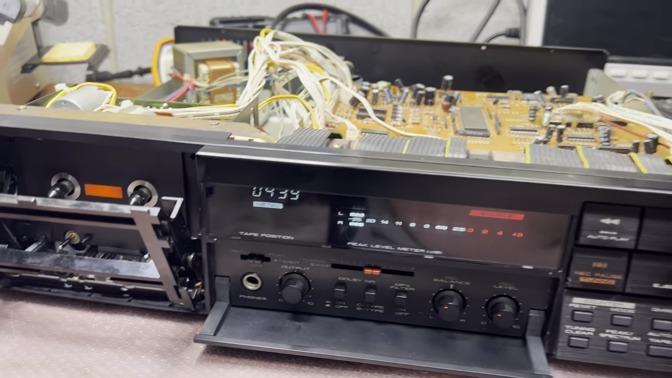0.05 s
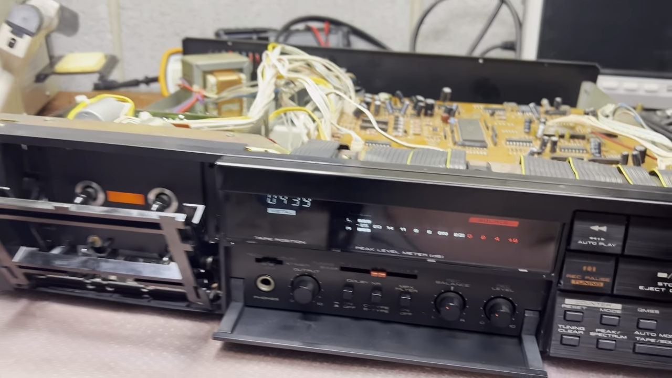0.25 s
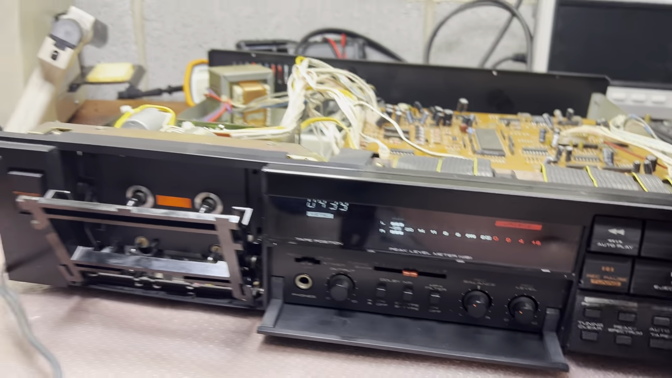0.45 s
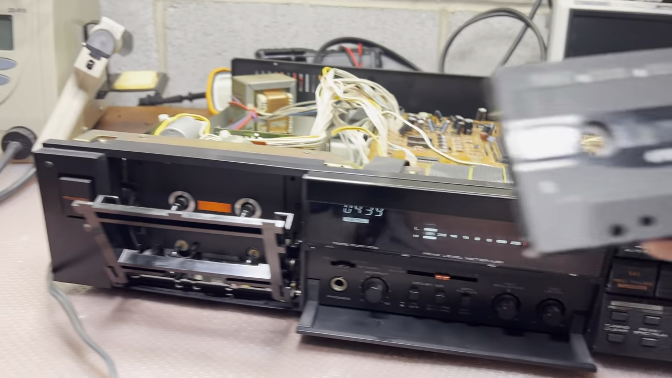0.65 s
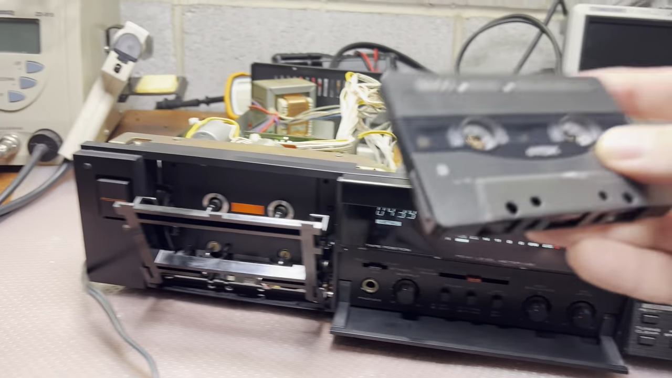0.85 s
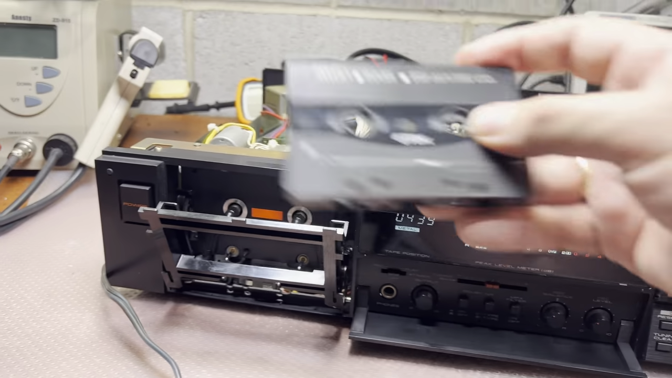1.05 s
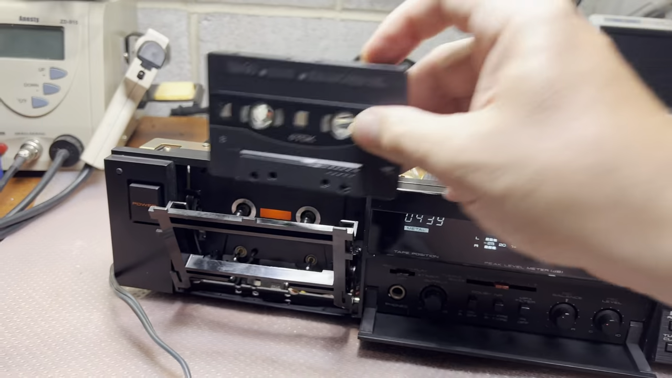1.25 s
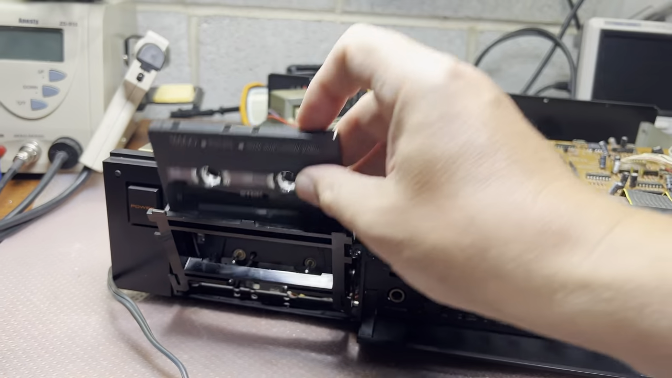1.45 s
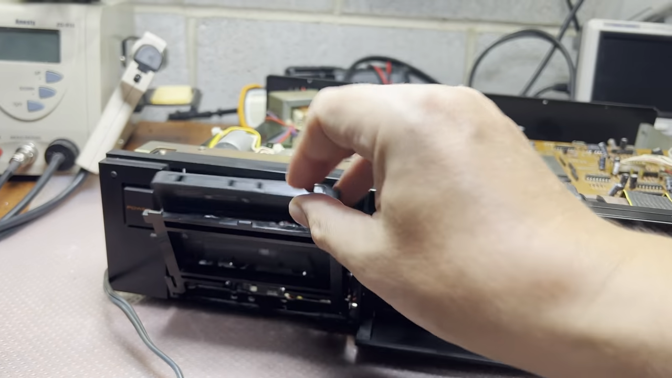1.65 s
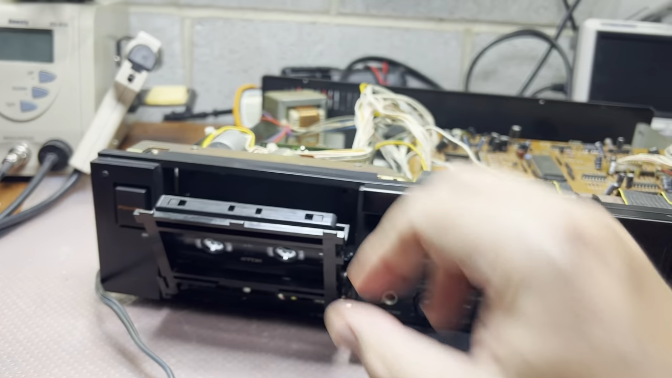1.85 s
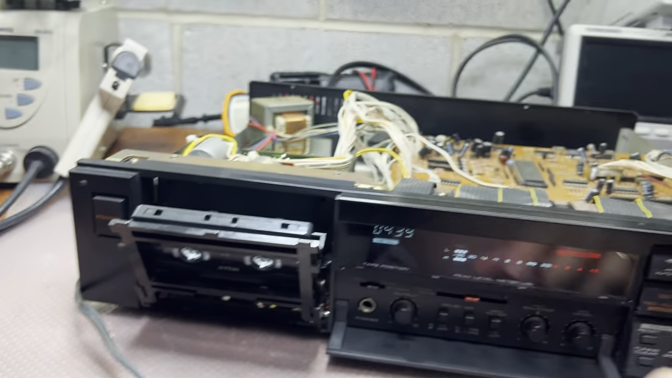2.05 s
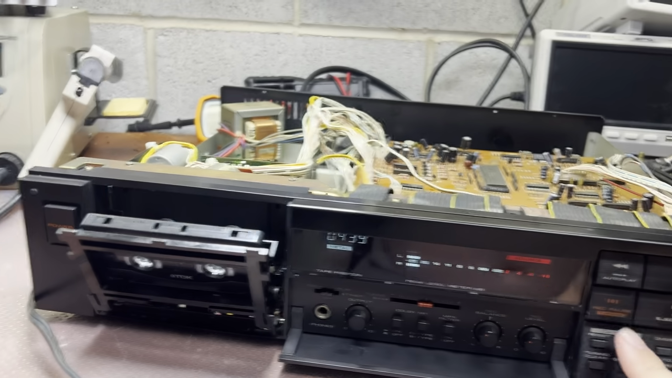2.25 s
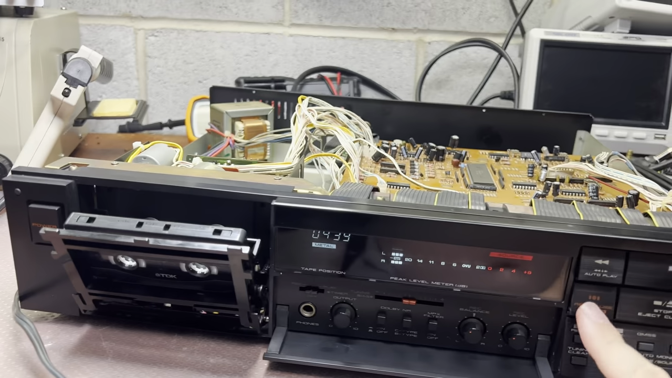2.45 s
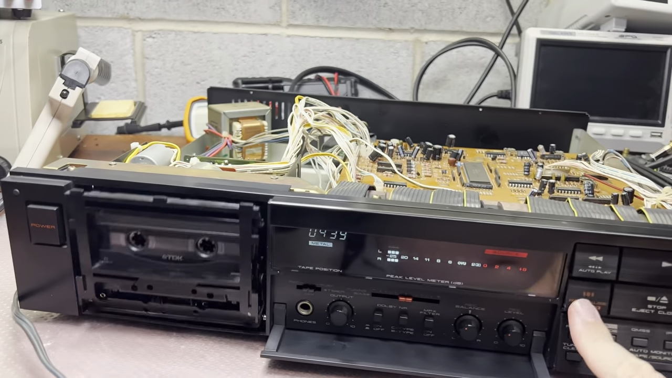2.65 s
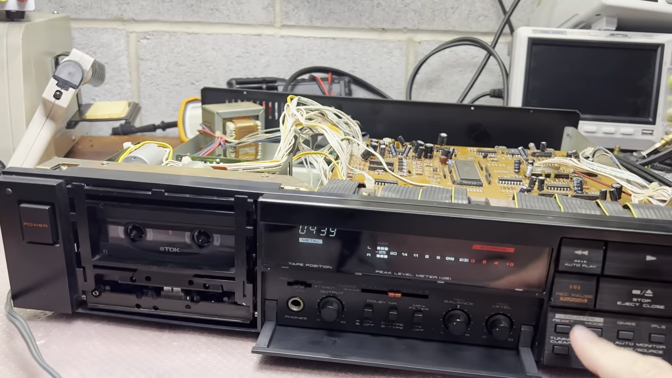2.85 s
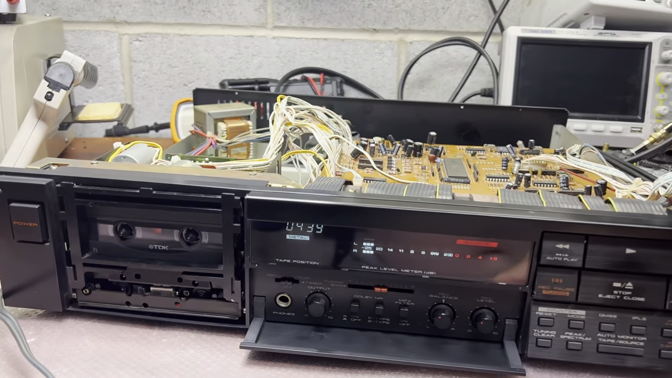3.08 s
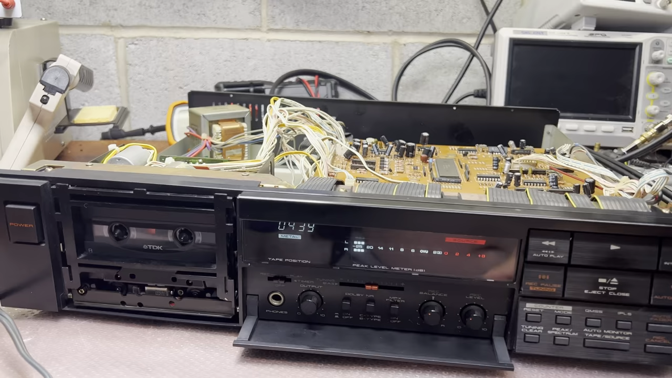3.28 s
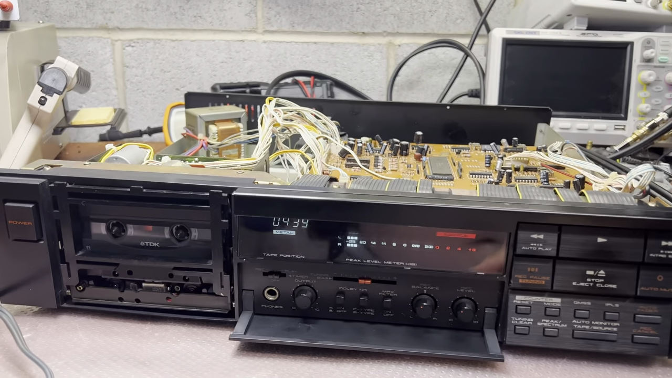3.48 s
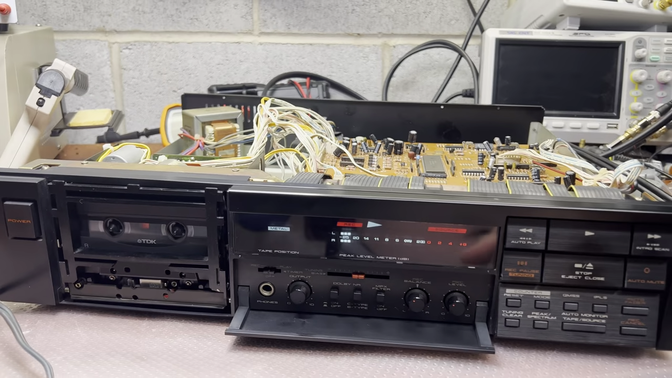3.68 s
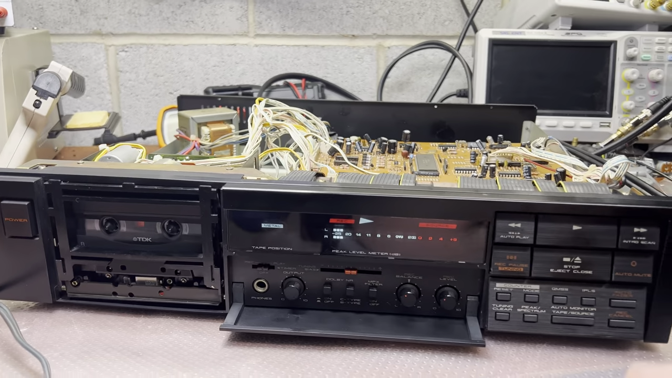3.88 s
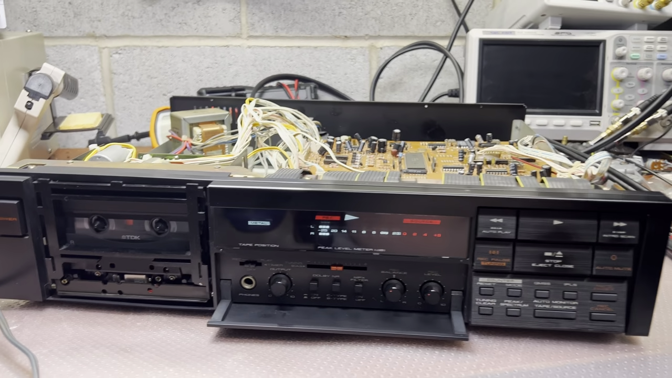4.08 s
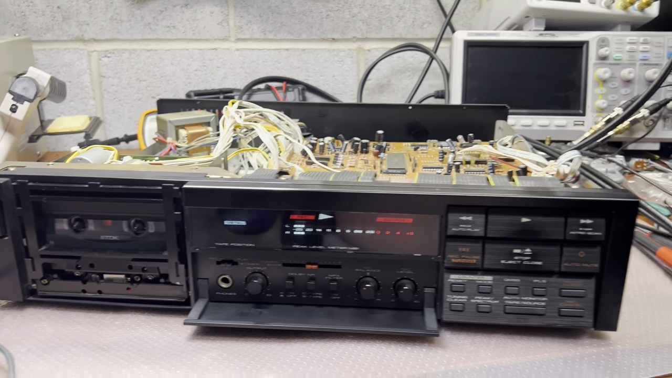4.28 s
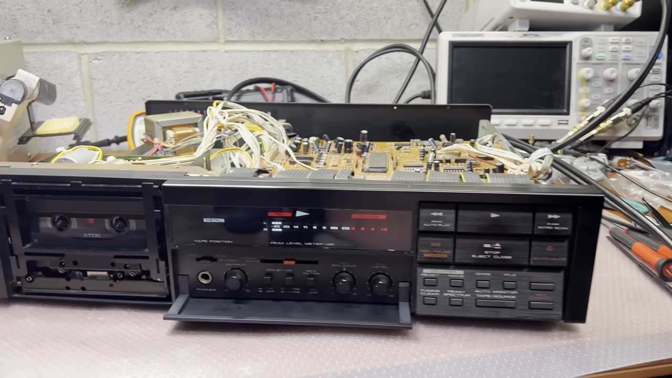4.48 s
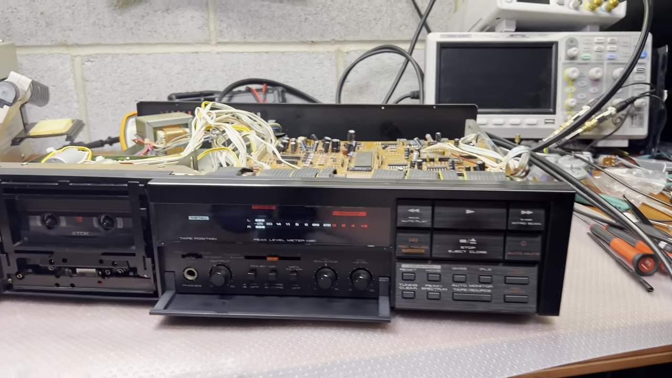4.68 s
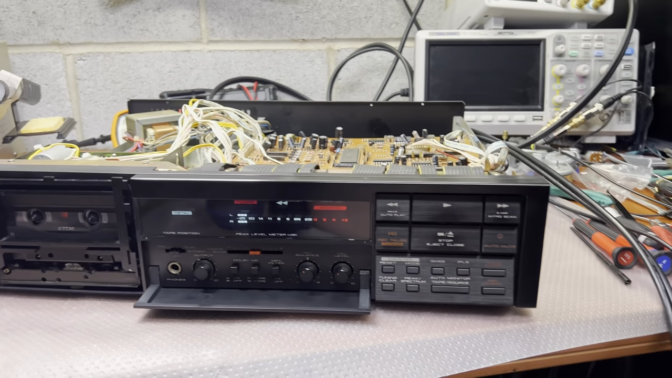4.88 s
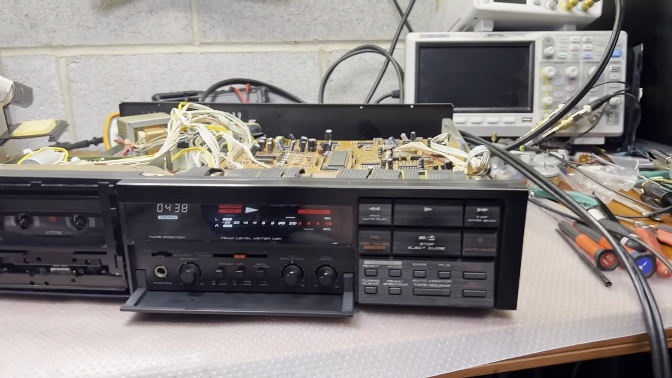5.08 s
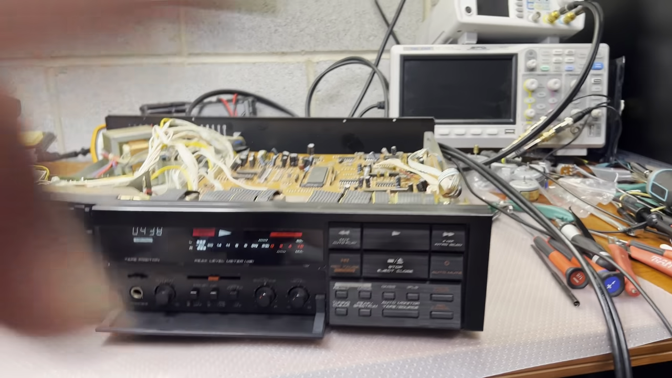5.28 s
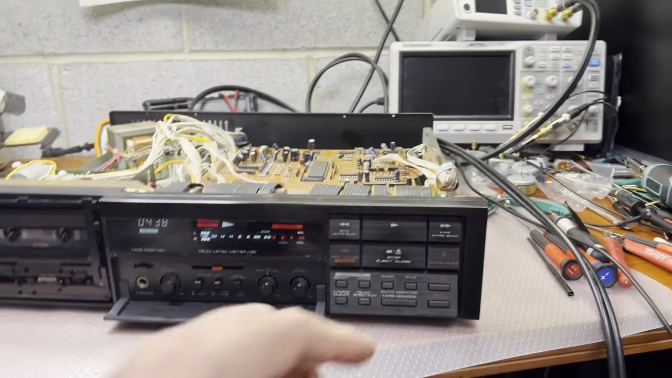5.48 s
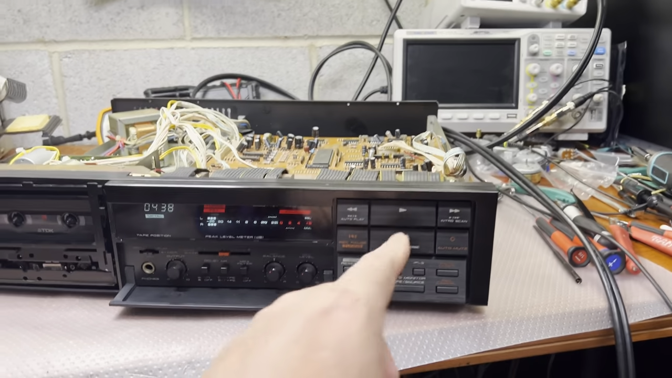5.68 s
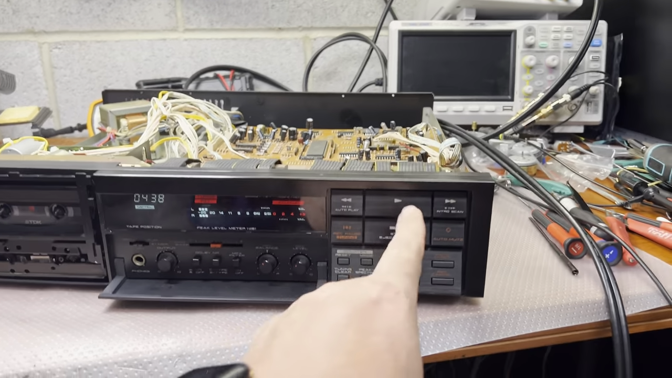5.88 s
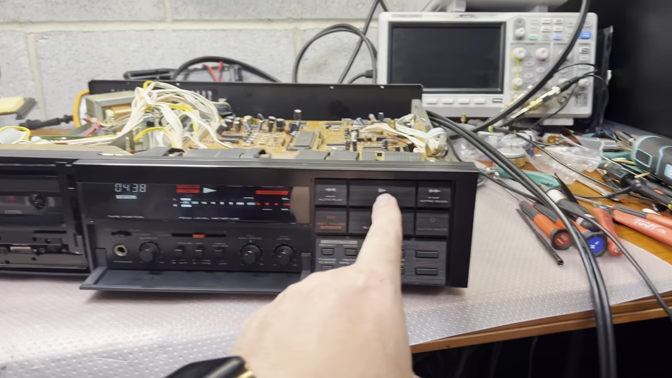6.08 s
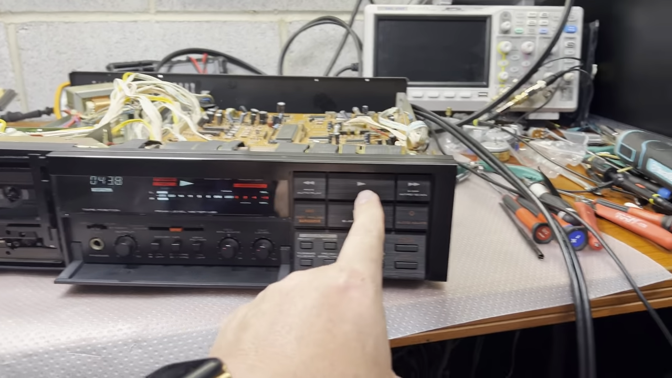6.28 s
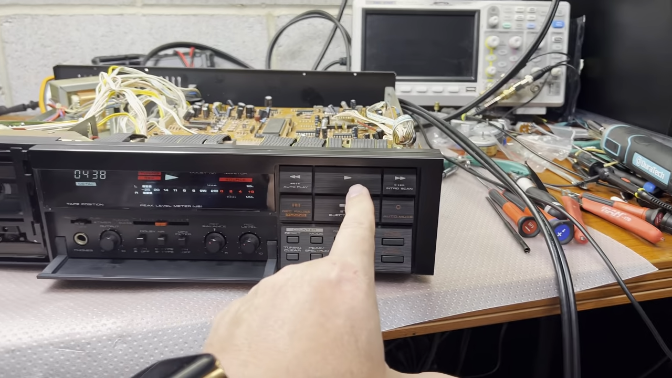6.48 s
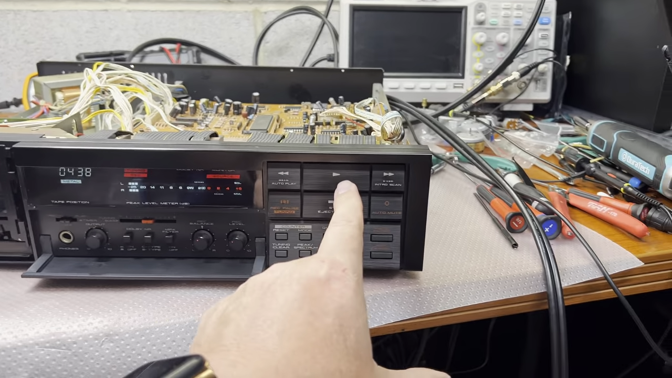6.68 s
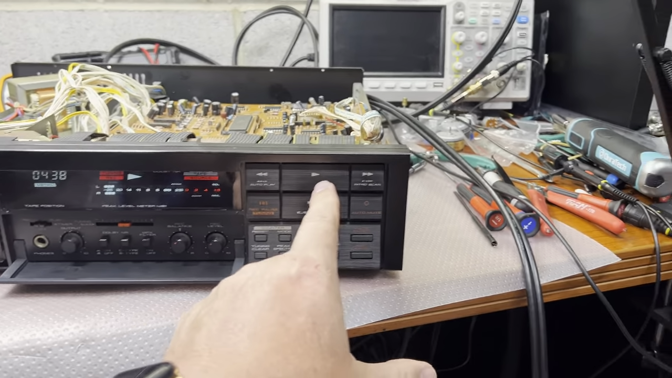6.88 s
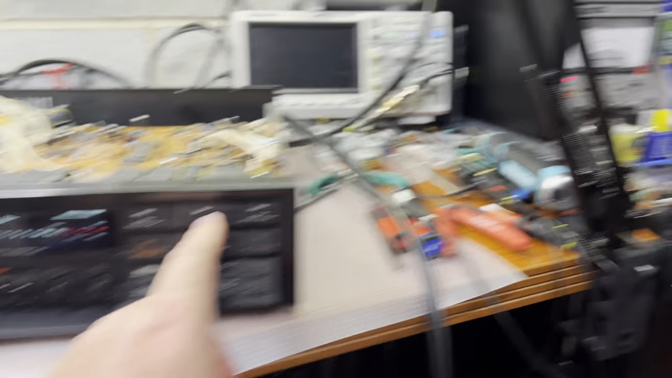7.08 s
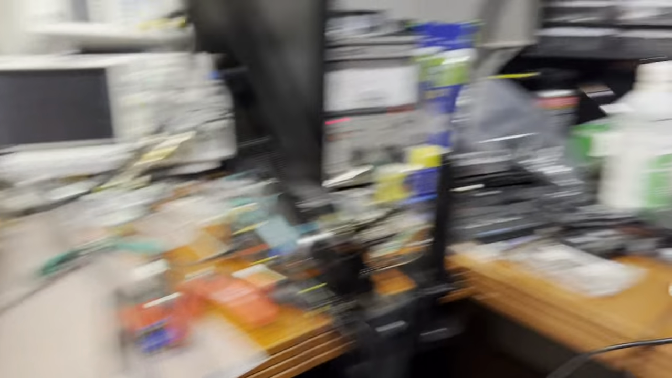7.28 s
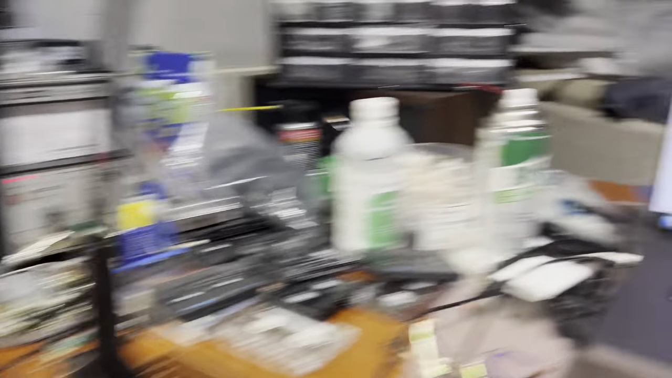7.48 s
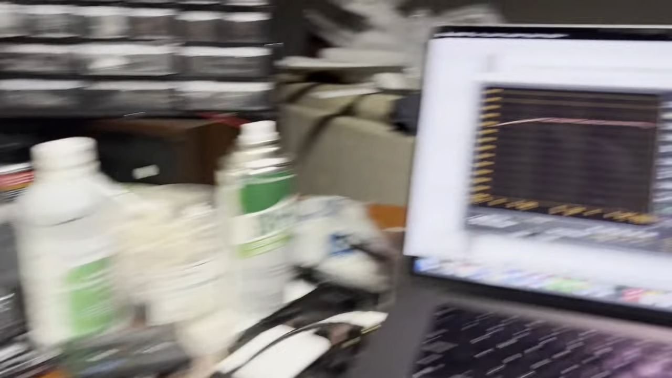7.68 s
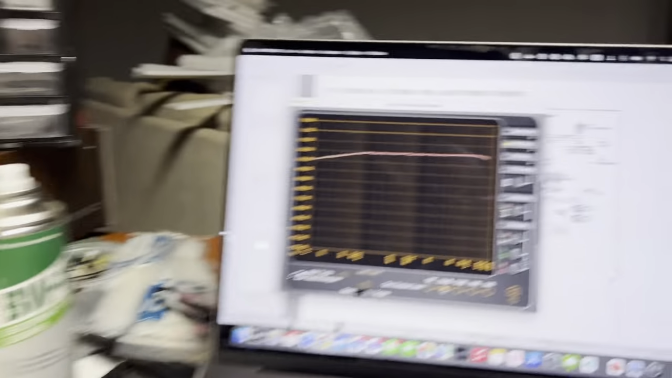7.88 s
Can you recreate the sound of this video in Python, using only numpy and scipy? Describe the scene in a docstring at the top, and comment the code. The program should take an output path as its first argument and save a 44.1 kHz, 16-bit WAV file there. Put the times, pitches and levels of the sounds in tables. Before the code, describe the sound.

Close handheld stereo pickup of a tape deck on a bench, in a short dry room with soft low rumble. Light hand rustle and a plastic rattle lead to a sharp cassette drop with tiny bounces. A button click sets gears chattering until the door bangs shut. Quiet ticking and whirring continue, a second cluster of clacks comes, then a button press, scattered ticks and closing bench clunks.

```python
"""A cassette rattles in the hand, drops into the holder of an open tape deck and the door is driven shut.
Buttons click, the cam drive ticks and whirrs through its changes, the bench gives low thumps and clunks;
a small workshop rumbles below. Knocks are short bursts of noise that make ringing bodies sound,
friction is grainy noise, motor whines are noise in narrow resonances, room tone is noise in bands."""
import sys
import numpy as np
from scipy import signal
from scipy.io import wavfile

SR = 44100
rng = np.random.default_rng(int(sys.argv[2]) if len(sys.argv) > 2 else 0)


def inscribe(sig):
    """Save sig as 16-bit PCM at rate SR to the path in sys.argv[1].

    A 1-D sig is mono; a 2-D sig holds one channel per row.
    Samples are clipped to [-1, 1] before scaling.
    """
    pcm = np.round(np.clip(np.atleast_2d(sig).T, -1, 1) * 32767)
    wavfile.write(sys.argv[1], SR, pcm.astype(np.int16))


def volts_from_db(level):
    """Convert decibel levels to linear amplitude ratios."""
    exponent = np.asarray(level, float) / 20
    return 10 ** exponent


N = 349884   # length in samples

# Steady noise of the workshop: pitch_hz, level_db_per_hz (only the shape counts)
ROOM_TONE_SPECTRUM = [(15, -39.5), (25, -19), (60, -1), (92, -12.5), (197, -20), (258, -16.5), (296, -20),
                      (421, -22.5), (853, -30.5), (926, -42), (1090, -26.5), (1430, -38), (2030, -28),
                      (3410, -75), (16500, -78.5)]
# How alike left and right are in noise, 1 same and -1 opposite: pitch_hz, likeness
LEFT_RIGHT_LIKENESS = [(60, 0.96), (240, 0.86), (950, -0.38), (3770, -0.73), (15000, -0.35)]
# Where the bench lies as the microphone turns: time_s, left_over_right_db
BENCH_BEARING = [(0.9, 1.5), (1.75, 3), (2.8, 5.5), (4.3, 4), (4.9, -0.2), (6.7, 1.5), (7.3, 2), (7.9, -4)]
# Motor whines and whirrs: start_s, length_s, pitch_hz, width_hz, level_db
MOTOR_WHINES = [(2.9, 1.7, 888, 8.3, -72), (0, 7.9, 905, 30, -79), (2.5, .22, 7300, 150, -80),
                (2.9, .26, 7300, 150, -77), (3.6, 1.06, 7650, 900, -80), (7.35, .6, 1340, 130, -65),
                (7.3, .65, 1600, 160, -65), (7.2, .75, 5400, 1200, -76)]
# Bright noise of rubbing plastic: pitch_hz, level_db_per_hz (only the shape counts)
RUSTLE_SPECTRUM = [(1470, -29), (2500, -12), (8420, -10.5), (9120, -11), (9790, -43), (10600, -32.5),
                   (10900, -11), (11500, -8.5), (14900, -6), (16000, -8), (16500, -34)]
# Hand and sleeve brushing, a swell each: start_s, length_s, rustle_db, airy_top_over_rustle_db
HAND_BRUSHES = [(0.144, .4, -78.5, 5), (0.683, 0.38, -68.5, -.4), (1.042, 0.26, -87, 5),
                (1.574, 0.26, -59.5, 2), (2.154, 0.22, -83, -4), (2.472, 0.27, -77.5, 12),
                (4.862, 0.26, -70.5, 9), (5.26, 0.37, -69, -8), (5.55, 0.18, -67, -14.5),
                (5.78, 0.17, -72.5, -5.5)]
# Plastic parts slide or gears run, sudden start and slow stop:
# start_s, length_s, grind_db, rustle_over_grind_db
SLIDES = [(0.986, 0.076, -50.5, -12), (1.46, 0.023, -46, -4), (1.681, 0.13, -47, -9),
          (2.442, 0.11, -60, -10.5), (2.605, 0.22, -64, -5), (2.794, 0.092, -52.5, 0),
          (2.832, 0.094, -53.5, -10), (3.0, 0.67, -68, -11.5), (3.582, 0.043, -59, 0.5),
          (3.707, 0.97, -69, -8), (4.697, 0.26, -55, -12.5), (4.803, 0.069, -51, -22),
          (4.954, 0.14, -63.5, -29), (5.024, 0.075, -52, -12), (6.66, 0.027, -59, -6),
          (6.74, 0.11, -62.5, -2), (6.9, .3, -70, -5), (7.155, 0.3, -61.5, -7), (7.5, 0.54, -64, -17.5)]

# Knocks, one table a body: time_s, low_modes_peak_db, high_modes_peak_db, struck_spot_pitch_hz
# Low thumps and clunks of the bench, some under the cassette and door slams
BENCH_THUMPS = [(1.495, -40, -47, 430), (1.729, -29.5, -69, 78), (2.777, -30, -68.5, 383),
                (3.95, -48.5, -61, 571), (4.017, -45.5, -41.5, 458), (5.592, -47.5, -55.5, 468.5),
                (5.633, -54, -46.5, 404.6), (7.273, -43, -58.5, 225.5), (7.377, -44, -65, 245),
                (7.809, -42, -53.5, 514), (7.838, -29, -40, 505), (7.892, -29.5, -36, 480)]
BUTTON_KNOCKS = [(2.438, -55.5, -59, 1380), (2.456, -33.5, -47, 1540), (2.497, -47, -54, 1230),
                 (6.669, -30.5, -40.5, 1580)]
DRIVE_KNOCKS = [(2.569, -48, -51.5, 972), (2.619, -43.5, -42.5, 1060), (2.676, -46.5, -34.5, 1370),
                (2.692, -44, -39, 1300), (2.718, -39, -30.5, 1550), (2.739, -37, -50.5, 1220),
                (2.746, -36, -29.5, 1517), (2.883, -48, -38, 1223), (2.947, -37.5, -36.5, 1240),
                (3.02, -54, -52, 823), (3.562, -51, -49, 1060), (3.6, -54, -47.5, 1230),
                (3.668, -47, -44, 1140), (3.687, -45.5, -40.5, 1317), (4.69, -51, -47, 1180),
                (4.747, -53, -54.5, 1140), (4.782, -41.5, -35, 1550), (4.843, -35.5, -37.5, 2300),
                (4.853, -36, -37.5, 1640), (4.912, -49, -47, 1454), (5.035, -52.5, -52, 1110),
                (5.071, -44, -41, 2430), (5.136, -37.5, -37, 1260), (5.206, -52.5, -54, 1300),
                (5.648, -52, -59, 912), (6.749, -48.5, -43, 2426), (6.836, -49.5, -37.5, 1180),
                (6.854, -49, -47, 1660)]
DOOR_KNOCKS = [(2.768, -28.5, -38, 1097), (2.775, -10.5, -4, 1214)]
CASSETTE_KNOCKS = [(0.972, -45, -33, 1420), (0.979, -32.5, -35, 1440), (0.996, -47, -34.5, 1270),
                   (1.014, -24.5, -26, 1530), (1.454, -38.5, -43, 1450), (1.458, -30.5, -44, 1450),
                   (1.468, -30.5, -34, 1480), (1.484, -34, -45, 950), (1.499, -44.5, -39, 1300),
                   (1.522, -39.5, -39, 2250), (1.533, -48, -36, 1010), (1.629, -40, -36.5, 1557),
                   (1.691, -37.5, -24, 1380), (1.7, -38.5, -22, 921), (1.705, -20.5, -28, 1560),
                   (1.718, -7.5, -7.5, 1090), (1.722, -12.5, -13.5, 1740), (1.739, -23, -24.5, 1400),
                   (1.752, -26.5, -25.5, 1467), (1.765, -22.5, -21.5, 1480), (1.769, -23, -14, 1193)]
# Pawl ticks: time_s, low_modes_peak_db
PAWL_TICKS = [(3.202, -48), (3.284, -49), (3.393, -49.5), (3.523, -48), (3.633, -46), (3.744, -47),
              (3.986, -45), (4.095, -46.5), (4.216, -46.5), (5.561, -47), (5.903, -66), (7.201, -52),
              (7.302, -46.5), (7.315, -48.5), (7.387, -47.5), (7.397, -49.5), (7.47, -45.5), (7.48, -49),
              (7.698, -50), (7.807, -53.5)]
# Loose parts bounce to rest after a blow: start_s, peak_db, first_gap_ms, loss_per_bounce_db
HOLDER_BOUNCES = [(2.782, -29.5, 7.5, 5.2)]
SHELL_BOUNCES = [(1.029, -24, 8.8, 2.2), (1.73, -16, 7.6, 2.6), (1.778, -26, 7.5, 4.5)]

# Ringing modes, one table a body: pitch_hz, level_db (against the other modes), fall_by_60_db_s
BENCH_MODES = [(78, 7.5, 0.068), (234.4, 1.5, 0.036), (326, -1.5, 0.056), (514, 2.5, 0.032),
               (616, -2, 0.0097), (996, -1.5, .03), (1550, -2.5, 0.0087), (1990, -7, 0.022),
               (2880, -10.5, 0.0082)]
KEY_MODES = [(431.8, 13, 0.056), (890, -3.5, 0.075), (1380, -6.5, 0.01055), (1580, 9.5, 0.019),
             (1860, -13, 0.063), (2450, -39.5, 0.06), (3720, -15, 0.045), (8300, -36, 0.023)]
PAWL_MODES = [(886, 0, 0.028), (1220, 2, 0.012), (1950, -11, .015), (3970, -7, 0.019), (4400, 2, 0.0028),
              (5150, -5.5, 0.0075), (7520, -12.5, 0.0095)]
CHASSIS_MODES = [(934, 9, 0.009), (1190, 5.5, 0.013), (1240, 2.5, 0.039), (1550, -5.5, 0.012),
                 (2030, 1.5, 0.016), (2520, -10.5, 0.066), (3820, -5.5, .022), (5148, -5, 0.0042),
                 (6840, -0.5, 0.0027), (13380, -41.5, 0.014)]
HOLDER_MODES = [(430, 1, 0.026), (1024, -2.5, 0.045), (1220, -4.5, 0.045), (1480, 1, 0.016),
                (2040, -2, 0.0055), (2655, 3, 0.025), (4660, -6.5, 0.015), (5370, 3.4, 0.041),
                (7810, -5.5, .008), (13890, -6, 0.0017)]
SHELL_MODES = [(490, -12, 0.015), (1034, -7, 0.045), (1354, -3, 0.011), (1510, -2.5, 0.028),
               (2130, -6.5, 0.0067), (2580, 0.5, 0.11), (5514, -15, 0.024), (7600, -4, .016),
               (7770, -5, 0.018), (14350, -8.5, 0.0008)]

SPLIT_HZ = 3200   # border of low and high modes
STOP_DB_PER_S = 171   # how fast slides and whines die away


def rms_one(x):
    """Scale to rms 1."""
    return x / np.sqrt(np.mean(x ** 2) + 1e-20)


def in_time(rows):
    """Columns of a curve, read at every sample."""
    s, *columns = np.transpose(rows)
    return [np.interp(np.arange(N) / SR, s, c) for c in columns]


def at_hz(points, hz):
    """A spectrum read on a log-frequency axis."""
    table_hz, value = np.transpose(points)
    return np.interp(np.log(hz), np.log(table_hz), value)


def drift(rate_hz):
    """Slow random wander of rms 1, made at every 40th sample and joined by lines."""
    r = np.exp(-2 * np.pi * rate_hz * 40 / SR)
    noise = rng.standard_normal(N // 40 + 2002)
    slow = signal.lfilter([1], [1, -2 * r, r * r], noise)[2000:]   # the filter has settled by then
    return np.interp(np.arange(N) / 40, np.arange(len(slow)), rms_one(slow))


def held(start_s, length_s, db, rise_s, fall_db_per_s):
    """Power of a sound that rises, holds and dies away."""
    t = np.arange(N) / SR - start_s
    rise = np.clip(t / rise_s, 0, 1) ** 2
    return rise * volts_from_db(2 * (db - fall_db_per_s * np.clip(t - length_s, 0, 1)))


def ring(force, hz, t60_s):
    """One mode, a resonance; short rings are lifted so that noise drives all modes alike."""
    r = volts_from_db(-60 / (t60_s * SR))
    w = 2 * np.pi * hz / SR
    drive = np.sqrt(1 - r * r) / 2 * np.array([1, 0, -1])
    return signal.lfilter(drive, [1, -2 * r * np.cos(w), r * r], force)


def coloured_noise(spectrum, patchy_db, flicker_hz):
    """Third-octave bands of stereo noise, each with its own level, flicker and likeness; rms 1."""
    bottom, top = spectrum[0][0], spectrum[-1][0]
    edges = np.geomspace(bottom, top, round(3 * np.log2(top / bottom)) + 1)
    white = rng.standard_normal((2, 2, N))
    out = 0
    for k, (low, high) in enumerate(zip(edges, edges[1:])):
        band = signal.butter(2, [low, high], "band", fs=SR, output="sos")
        mid, side = signal.sosfilt(band, white[k % 2])
        hz = np.sqrt(low * high)
        alike = at_hz(LEFT_RIGHT_LIKENESS, hz)
        gain = volts_from_db(at_hz(spectrum, hz) + patchy_db * drift(flicker_hz))
        out = out + gain * (np.sqrt(1 + alike) * mid + np.sqrt(1 - alike) * side * [[1], [-1]])
    return rms_one(out)


def room_tone():
    """Workshop rumble: steady low noise with slowly wandering bands, a little stronger on the right."""
    noise = coloured_noise(ROOM_TONE_SPECTRUM, patchy_db=1.5, flicker_hz=2.1)
    return volts_from_db(-51.5) * noise * volts_from_db([[-1.2], [1.2]])


def room(x):
    """Six feedback delays a side, each echo duller and weaker than the one before."""
    t60_s, wall_cut_hz = 0.2, 8000
    dull = np.exp(-2 * np.pi * wall_cut_hz / SR)
    out = np.zeros((2, N))
    lags = (rng.uniform(0.008, 0.03, 12) * SR).astype(int)
    for k, lag in enumerate(lags):
        gain = volts_from_db(-60 * lag / SR / t60_s)
        loop, state = x.copy(), [0.]
        for i in range(lag, N, lag):
            back, state = signal.lfilter([gain * (1 - dull)], [1, -dull], loop[i - lag:i], zi=state)
            loop[i:i + lag] += back[:N - i]
        out[k % 2] += (loop - x) * (-1) ** (k // 2)   # echoes only, in mixed signs
    return out


def motors():
    """Faint unsteady whines: noise in narrow resonances."""
    out = 0
    for s, length_s, hz, width_hz, db in MOTOR_WHINES:
        whine = ring(rng.standard_normal(N), hz, 2.2 / width_hz)   # a narrow mode rings long
        power = held(s, length_s, db, rise_s=0.08, fall_db_per_s=STOP_DB_PER_S)
        out = out + np.sqrt(power) * rms_one(whine)
    return out


def friction_powers():
    """Power of grind, rustle and airy top in time: a quiet idle, slides and hand swells added up."""
    grind, rustle, airy = volts_from_db(2 * np.array([-73.5, -97, -83.5]))   # idle
    for s, length_s, db, bright_db in SLIDES:
        power = held(s, length_s, db, rise_s=0.0069, fall_db_per_s=STOP_DB_PER_S)
        grind = grind + power
        rustle = rustle + power * volts_from_db(2 * bright_db)
        airy = airy + power * volts_from_db(2 * (bright_db - 6))
    for s, length_s, db, airy_db in HAND_BRUSHES:
        phase = np.clip((np.arange(N) / SR - s) / length_s, 0, 1)
        power = volts_from_db(2 * db) * np.sin(np.pi * phase) ** 2
        grind = grind + power * volts_from_db(2 * 5.5)
        rustle = rustle + power
        airy = airy + power * volts_from_db(2 * airy_db)
    return grind, rustle, airy


def friction():
    """Gear teeth and sliding plastic: noisy contacts in the low chassis modes, and a grainy bright rustle."""
    grind_power, rustle_power, airy_power = friction_powers()
    # dense random catches of uneven size roughen the grind
    catches_per_s, catch_db, catch_ms = 90, -3.5, 6.4
    catches = (rng.random(N) < catches_per_s / SR) * volts_from_db(catch_db) * rng.exponential(1, N)
    grain = volts_from_db(0.7 * drift(110))
    catching = grain + signal.lfilter([1], [1, -np.exp(-1000 / (catch_ms * SR))], catches + 1e-18)
    teeth = rng.standard_normal((2, N)) * catching
    # rubbing parts ring shorter than struck ones
    low_modes = [mode for mode in CHASSIS_MODES if mode[0] < SPLIT_HZ]
    grind = rms_one(sum(volts_from_db(db) * ring(teeth, hz, 0.6 * t60_s) for hz, db, t60_s in low_modes))
    bright = coloured_noise(RUSTLE_SPECTRUM, patchy_db=0.95, flicker_hz=12) * grain
    rustle = signal.sosfilt(signal.butter(4, 10000, "low", fs=SR, output="sos"), bright)
    airy = signal.sosfilt(signal.butter(4, 10000, "high", fs=SR, output="sos"), bright)
    out = np.sqrt(grind_power) * grind + np.sqrt(rustle_power) * rms_one(rustle)
    return out + np.sqrt(airy_power) * rms_one(airy)


def contact_force(t, tau_s, rattle_db, side_db, solid):
    """Stereo push of a scratchy contact and its weaker, longer after-rattle; solid adds a smooth shove."""
    grit, other = rng.standard_normal((2, len(t)))
    rattle = volts_from_db(rattle_db) * np.exp(-t / (8.6 * tau_s))
    push = np.minimum(t / (0.4 * tau_s), 1) * (np.exp(-t / tau_s) + rattle)
    # the two microphone ports differ in the middle range by a quarter-cycle shift
    # and by facing other parts of the body
    ports = signal.butter(1, [450, 9500], "band", fs=SR, output="sos")
    shifted = signal.hilbert(grit).imag
    apart = volts_from_db(side_db) * signal.sosfilt(ports, shifted + 0.35 * other)
    # in this band the ports hear nearly opposite phases
    flip = signal.butter(2, [7000, 9050], "band", fs=SR, output="sos")
    apart = apart + volts_from_db(side_db + 4) * signal.sosfilt(flip, shifted)
    return (grit + solid + apart * [[1], [-1]]) * push + 1e-18


def knocks(events, modes, contact_ms, low_hz, split_hz, dull_db, bright_db, top_hz, rattle_db, side_db,
           focus_db=9.0, solid=0):
    """Contacts drive the modes of a body; the bare contact is heard as a broad crack.

    focus_db is the loss of a low mode an octave away from the struck pitch."""
    out, t = np.zeros((2, N)), np.arange(SR // 5) / SR
    tau_s = contact_ms / 1000
    dull = signal.butter(2, [low_hz, split_hz], "band", fs=SR, output="sos")
    below = signal.butter(2, split_hz, fs=SR, output="sos")
    above = signal.butter(2, [split_hz, top_hz], "band", fs=SR, output="sos")
    bearing_db, = in_time(BENCH_BEARING)
    for s, low_db, high_db, struck_hz in events:
        # the direction scatters at random from knock to knock
        pan_db = bearing_db[int(s * SR)] + 4.5 * rng.standard_normal()
        force = contact_force(t, tau_s, rattle_db, side_db, solid)
        low = volts_from_db(dull_db) * signal.sosfilt(dull, force)
        high = volts_from_db(bright_db) * force
        for (hz, db, t60_s), chance in zip(modes, rng.standard_normal(len(modes))):
            if hz < split_hz:   # the low modes nearest the struck spot's pitch speak best
                octaves_off = abs(np.log2(hz / struck_hz))
                low = low + volts_from_db(db + chance - focus_db * octaves_off) * ring(force, hz, t60_s)
            else:   # the high modes vary more from knock to knock
                high = high + volts_from_db(db + 3 * chance) * ring(force, hz, t60_s)
        knock = 0
        for part, db in ((signal.sosfilt(below, low), low_db), (signal.sosfilt(above, high), high_db)):
            knock = knock + volts_from_db(db) * part / np.abs(part.mean(axis=0)).max()
        knock = knock * volts_from_db([[pan_db / 2], [-pan_db / 2]])
        at = round((s - 0.23 * tau_s) * SR)   # the push begins a little early
        out[:, at:at + len(t)] += knock[:, :N - at]
    return out


def bounces(rows):
    """Knocks of a part settling: each bounce is weaker and comes sooner than the last."""
    k = np.arange(6)
    events = []
    for s, first_db, gap_ms, loss_db in rows:
        for i in k:
            time_s = s + gap_ms / 1000 * np.sum(0.87 ** k[:i])   # every gap is 0.87 of the last
            db = first_db - loss_db * i
            events.append((time_s, db, db - 9, 1480))
    return events


def bench_thumps():
    """Low thumps and clunks of the bench, some under the cassette and door slams: low, dull modes."""
    return knocks(BENCH_THUMPS, BENCH_MODES, 3.2, 150, SPLIT_HZ / 4, solid=0.3, focus_db=10.5, dull_db=-25.5,
                  bright_db=-9, top_hz=2800, rattle_db=-13, side_db=-6.0)


def buttons():
    """Button clicks: a pressed key rings in its own modes with almost no dull crack."""
    return knocks(BUTTON_KNOCKS, KEY_MODES, 2.3, 740, SPLIT_HZ, dull_db=-61, bright_db=-1.0, top_hz=14800,
                  rattle_db=-22, side_db=-5.0)


def pawl_ticks():
    """Pawl ticks: small knocks that all share one struck pitch."""
    ticks = [(s, db, db + 0.9, 1200) for s, db in PAWL_TICKS]
    return knocks(ticks, PAWL_MODES, 2.1, 1200, SPLIT_HZ, dull_db=-0.5, bright_db=1.5, top_hz=13600,
                  rattle_db=-8.5, side_db=-3.0)


def cam_drive():
    """Cam drive knocks: longer, scratchy contacts in the chassis."""
    return knocks(DRIVE_KNOCKS, CHASSIS_MODES, 4.6, 800, SPLIT_HZ, focus_db=16.5, dull_db=-9.5, bright_db=6.5,
                  top_hz=12800, rattle_db=-15.0, side_db=-5.5)


def door():
    """The door shuts: a soft lead-in and one hard blow in the holder, then loose parts bounce to rest."""
    return knocks(DOOR_KNOCKS + bounces(HOLDER_BOUNCES), HOLDER_MODES, 2.8, 800, SPLIT_HZ, dull_db=-3.5,
                  bright_db=5.0, top_hz=15800, rattle_db=-19.5, side_db=-0.5)


def cassette():
    """Cassette rattle and drop: knocks on the shell, with loose parts bouncing in very short contacts."""
    hits = knocks(CASSETTE_KNOCKS, SHELL_MODES, 2.2, 1050, SPLIT_HZ, focus_db=11.5, dull_db=-8.5,
                  bright_db=6.5, top_hz=14700, rattle_db=-12.5, side_db=-7.5)
    # a light bounce rings one mode, so its focus is sharp
    hits += knocks(bounces(SHELL_BOUNCES), SHELL_MODES, 0.2, 1200, SPLIT_HZ, focus_db=45, solid=4.0,
                   dull_db=-44, bright_db=2.5, top_hz=14600, rattle_db=-29.5, side_db=6)
    return hits


def scene():
    """Knocks on six bodies with their echoes, over friction, motors and room tone."""
    background = room_tone() + motors() + friction()
    hits = bench_thumps() + buttons() + pawl_ticks() + cam_drive() + door() + cassette()
    echoes = volts_from_db(-18) * room(hits.mean(axis=0))
    return background + echoes + hits


def top_cut(x):
    """Nothing passes above the cut-off."""
    return signal.sosfilt(signal.butter(12, 16620, fs=SR, output="sos"), x)


def record(dry):
    """The microphone ports have a deep dip near 10 kHz, and both ends of the range are cut."""
    dip = signal.butter(3, [9090, 11110], "bandstop", fs=SR, output="sos")
    heard = signal.sosfilt(dip, dry) + volts_from_db(-30.5) * dry   # a little leaks through the dip
    heard = signal.sosfilt(signal.butter(2, 32, "high", fs=SR, output="sos"), heard)
    heard = 0.95 * np.tanh(heard / 0.95)   # the loudest peaks are rounded
    heard = signal.sosfilt(signal.cheby2(8, 50, 16500, fs=SR, output="sos"), heard)
    return top_cut(heard)


dry = scene()
out = record(dry)
inscribe(out)
```